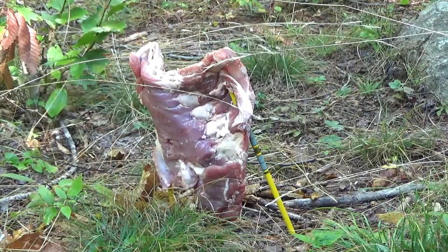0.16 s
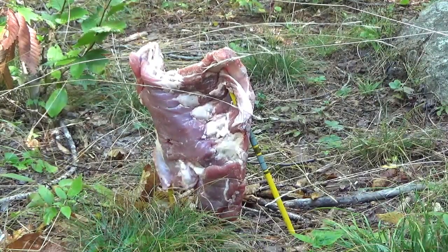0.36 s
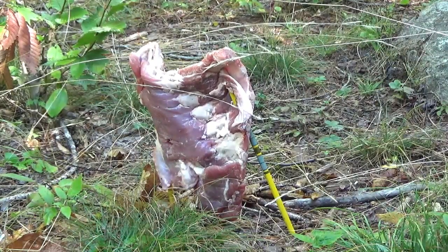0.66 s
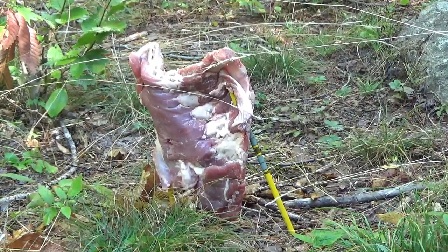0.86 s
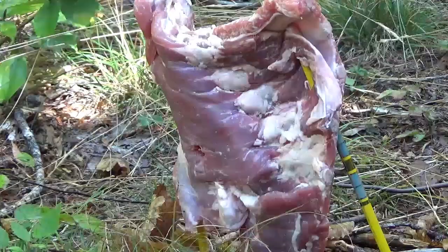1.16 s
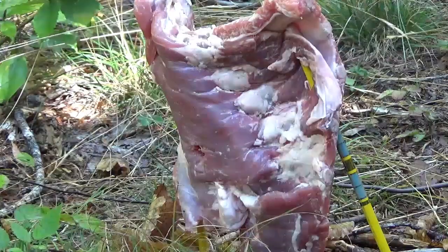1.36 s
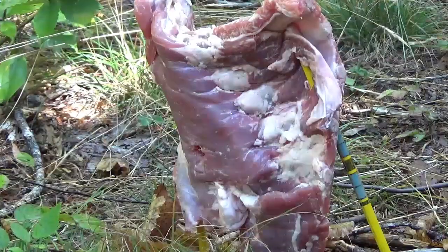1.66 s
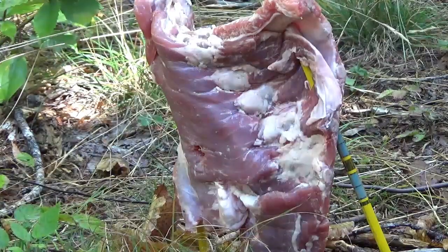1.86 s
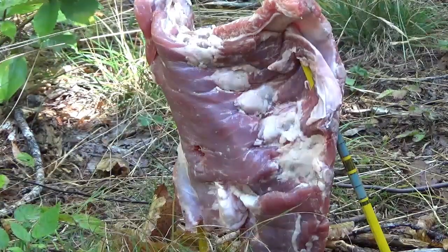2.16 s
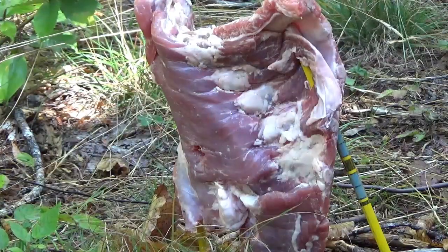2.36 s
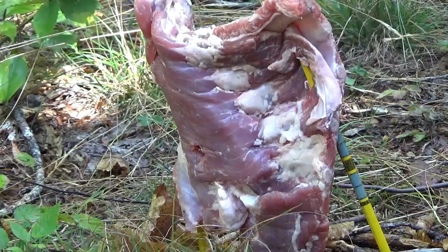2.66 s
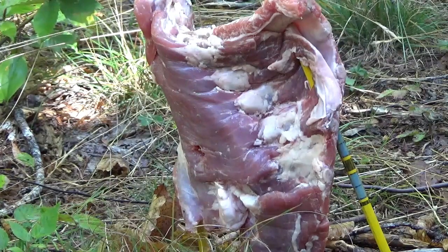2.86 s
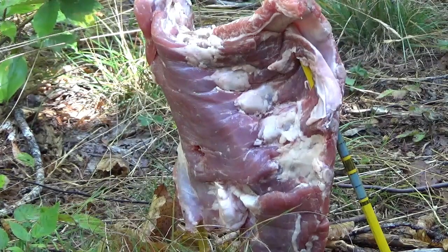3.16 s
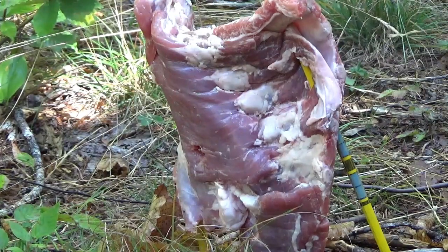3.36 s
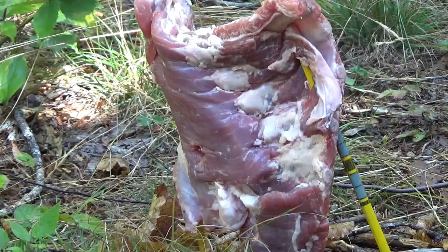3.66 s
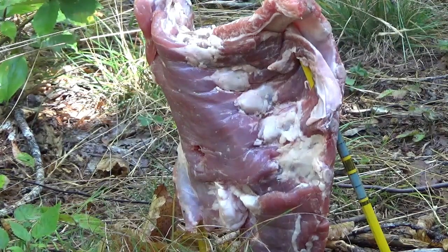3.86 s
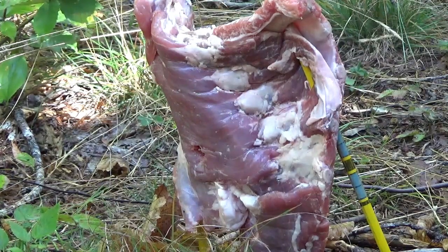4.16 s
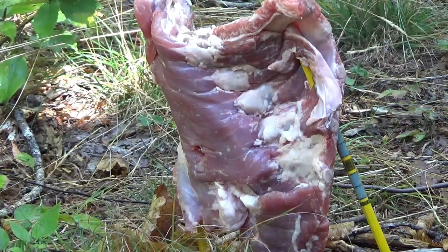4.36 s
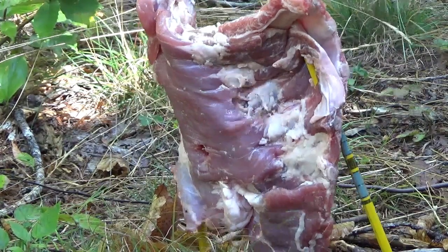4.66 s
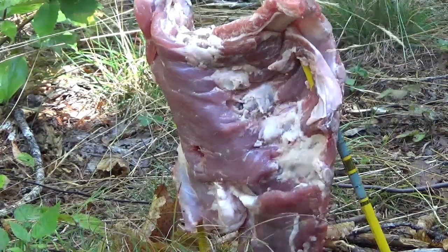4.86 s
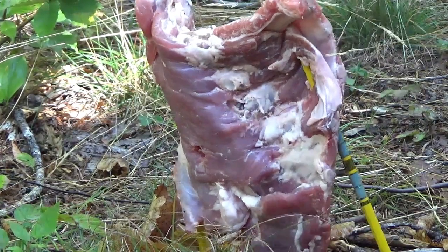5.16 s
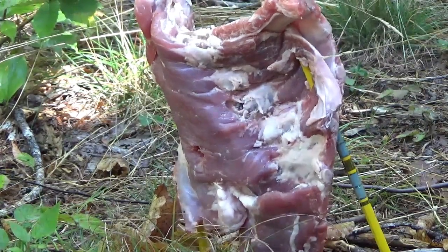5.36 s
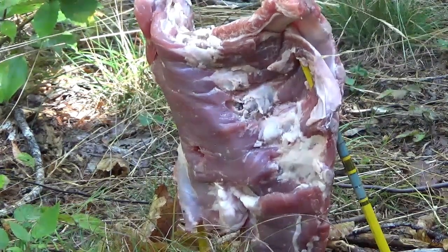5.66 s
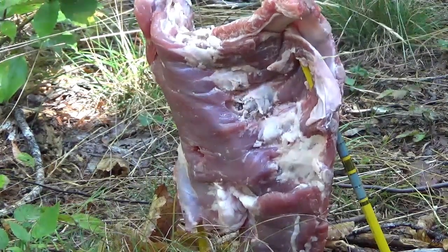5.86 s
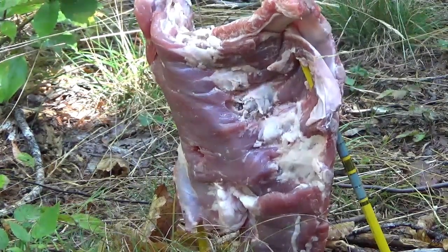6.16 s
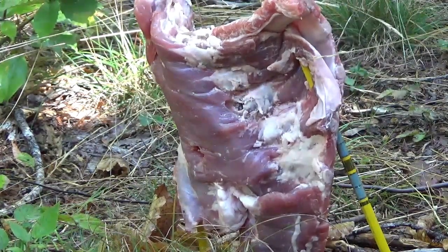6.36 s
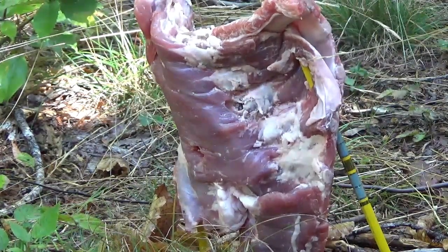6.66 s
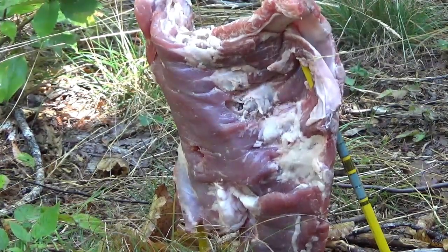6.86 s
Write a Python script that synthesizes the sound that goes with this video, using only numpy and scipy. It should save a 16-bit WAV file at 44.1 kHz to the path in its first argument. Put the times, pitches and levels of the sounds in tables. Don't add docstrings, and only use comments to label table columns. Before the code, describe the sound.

From 0 to 1.2 seconds there is a quiet, steady car on a far road: broad tyre roar with a low, uneven engine drone slowly receding. It cuts abruptly to a softer woodland hush of leaves, faint far road and microphone hiss. A cricket trills at once, a rapid string of thin high strokes around 4 kHz, swelling slightly and ending near 3.2 seconds as a few litter ticks sound. Tiny higher chirps follow around 3.8 to 4.3. At 4.42 the ball hits meat with a short wet slap and spray. At 4.53 the distant rifle's blast arrives, sudden and very loud, with several sharp swings and bright trunk echoes. A duller far echo swells behind, with distinct knocks near 4.8, then rolls away over the next second or so. Soil and twigs patter dryly from 5 to 7, brightest at 6.1, over quiet leaves.

```python
import sys
import numpy as np
from scipy import signal
from scipy.fft import rfft, irfft
from scipy.io import wavfile
from scipy.ndimage import uniform_filter1d, map_coordinates

SR = 44100
rng = np.random.default_rng(int(sys.argv[2]) if len(sys.argv) > 2 else 0)


def wrap_up_sound(samples):
    columns = np.atleast_2d(samples).T
    tamed = np.clip(columns, -1, 1)
    steps = np.round(tamed * 32767).astype(np.int16)
    wavfile.write(sys.argv[1], SR, steps)


def invert_db(x):
    u = np.asarray(x, float) / 20
    return 10 ** u


N = 309537

# f/Hz, density/dB
TYRE_SPECTRUM = [(150, -36), (250, -13.5), (441, -13), (551, -5.5), (743, -1.5), (1380, -5), (1720, -8),
                 (3230, -24.5), (3970, -22.5), (4500, -27.5), (7820, -33), (10900, -40), (14200, -72),
                 (22000, -120)]
# f/Hz, density/dB
ENGINE_SPECTRUM = [(13, -43), (22, -13), (38, -9), (71, 1), (102, -2), (141, -0.5), (215, -5), (243, -16),
                   (330, -17), (430, -45), (730, -120)]
# f/Hz, correlation/1
CAR_LIKENESS = [(60, 1.0), (170, 0.99), (500, 0.99), (1420, 0.66), (4090, 0.34), (11700, 0.88)]
# f/Hz, density/dB
HUSH_SPECTRUM = [(13, -38), (22, -11.5), (81, -8.5), (122, -4), (216, -10.5), (246, -6.5), (336, -8.5),
                 (878, -3.5), (1600, -9.5), (2360, -10.5), (4390, -13), (10900, -25.5), (14200, -90),
                 (22000, -120)]
# f/Hz, correlation/1
HUSH_LIKENESS = [(60, 1), (170, 0.9), (500, 0.85), (1420, 0.53), (4090, 0.41), (11700, 0.75)]
# t/s, level/dB
FAR_CHIRPS = [
    (1.245, -62),
    (3.84, -64),
    (3.97, -63),
    (4.10, -65),
    (4.32, -66),
]
# t/s, peak/dB, centre f/Hz, left-right/dB
LITTER_TICKS = [(3.1874, -44, 2920, 0), (3.188, -47, 1500, 2), (3.193, -48, 6500, 2), (3.222, -42, 3000, 0),
                (5.0394, -45, 6000, -1), (5.098, -42, 7400, 0), (5.1544, -42.5, 6000, 2),
                (5.223, -46, 7400, 8), (5.2604, -47, 5500, 2), (5.319, -40, 5200, 4),
                (5.3664, -55, 6000, 0), (5.442, -50, 8000, 4), (5.7564, -50, 6000, 0),
                (5.8634, -51, 3500, 0), (6.113, -37, 10700, -3), (6.113, -40.5, 6640, -10),
                (6.114, -49, 3400, -6), (6.151, -55, 4500, 0), (6.2054, -49, 7500, -2),
                (6.23, -44.5, 6600, -1), (6.258, -43.5, 3280, 0), (6.258, -48, 8000, 0),
                (6.4094, -49, 5200, 0), (6.8494, -55, 10500, -1), (6.985, -54, 9500, -1)]
# f/Hz, density/dB
SPRAY_SPECTRUM = [(180, -42), (300, -21), (676, -23), (739, -12), (1540, -1.5), (1820, -5.5), (6540, -6.5),
                  (10900, -11.5), (14200, -44), (22000, -120)]
# f/Hz, level/dB, t60/s
TARGET_MODES = [
    (1380, -23, .018),
    (3150, -32, .03),
    (5300, -37, .02),
    (780, -45, .06),
]
# f/Hz, density/dB
AHEAD_SPECTRUM = [(500, -2), (4000, -6), (8000, 5), (11000, -12)]
# t/s, peak/dB, ring f/Hz, left-right/dB
BLAST_SWINGS = [(4.5284, -6.5, 1300, 18), (4.5281, -8.5, 490, -5.5), (4.529, -21, 69, 3),
                (4.5355, -4.5, 1900, 1), (4.5361, -15.5, 140, 5), (4.538, -7, 4370, -1),
                (4.538, -2, 5500, 5), (4.543, -14, 3500, -4), (4.549, -12, 1800, -2),
                (4.5585, -27, 2300, -6), (4.5652, -17, 1190, -3), (4.8, -8, 1620, -8),
                (4.8593, -13, 1320, -11)]
# f/Hz, density/dB
NEAR_SPECTRUM = [(18, -48), (30, -18), (108, -20), (381, -9.5), (464, -7.5), (881, -2), (972, -5),
                 (1210, -1.5), (2950, -2.5), (4380, -0.5), (10900, -9.5), (14200, -74), (22000, -120)]
# f/Hz, density/dB
FAR_SPECTRUM = [(24, -53), (40, -24.5), (182, -17.5), (262, -10), (362, -10.5), (461, -4), (764, 0.5),
                (1900, -5.5), (2840, -18), (3210, -16), (5000, -37), (6500, -55), (11000, -120)]
# f/Hz, correlation/1
ROLL_LIKENESS = [(60, .95), (250, .8), (500, .68), (1400, .64), (4000, .68), (11000, .72)]
# f/Hz, loss/(dB/s)
NEAR_AIR_LOSS = [(60, -10), (300, -22), (1500, -23.5), (3000, 0.5), (5000, 9), (9000, 25), (10800, 63)]
# f/Hz, loss/(dB/s)
FAR_AIR_LOSS = [(40, 7), (100, 16), (250, -11.5), (550, -10.5), (1000, -4), (1600, 5), (2200, 18),
                (4000, 34.5)]

CHANGE_S = 1.1855
ROAR_DB, ENGINE_DB, ENGINE_SAG_DB_PER_S = -41, -48.5, 3
HUSH_DB, HUSH_SAG_DB_PER_S = -53.5, 0.21
FIRST_STROKE_S, STROKES_PER_S, STROKES = 1.2092, 44.2, 89
TIRES_AFTER, TIRED_LAG_S = 73, .00031
SONG_TOP_S, SONG_TOP_DB, SONG_ARCH_DB = 2.4, -55, 1.5
SONG_HZ, SONG_CLIMB_HZ_PER_S, STROKE_BEND_HZ = 4150, 60, 1050
SOIL_UNTIL_S, SOIL_Q, TWIG_Q = 5.2, 1.6, 2.05
TOP_HZ = 11070
SLAP_S, SLAP_DB = 4.4188, -34.5
FRONT_S = 4.5292
NEAR_COLOUR_S, FAR_COLOUR_S = 4.57, 5.1
NEAR_DB, NEAR_FLASH_DB, FLASH_S = -18, 4, .015
NEAR_HOLD_S, NEAR_KNEE_S, NEAR_FALL_DB_PER_S = 0.18, 0.039, 82
NEAR_REST_DB, NEAR_REST_DB_PER_S = -35.5, 30.5
FAR_DB, FAR_DELAY_S, FAR_RISE_DB_PER_S = -21, .11, 160
FAR_HOLD_S, FAR_KNEE_S, FAR_FALL_DB_PER_S = 0.18, 0.027, 33.5
FAR_REST_DB, FAR_REST_DB_PER_S = -39.5, 12.5
CYCLES_AT_1K, CYCLES_GROW = 1.95, 0.29
PUSH_BELOW_HZ, PUSH_CYCLES = 600, 0.88


def unit(x):
    return x / np.sqrt(np.mean(x ** 2) + 1e-20)


def along(points, hz):
    f, v = np.transpose(points)
    return np.interp(np.log(hz + 1), np.log(f + 1), v)


def wobble(knots_per_s):
    knots = rng.standard_normal(int(N * knots_per_s / SR) + 4)
    return map_coordinates(knots, [np.arange(N) * knots_per_s / SR])


def sides(db):
    return invert_db([[db / 2], [-db / 2]])


def add(track, s, sound):
    part = track[:, round(s * SR):][:, :sound.shape[1]]
    part += sound[:, :part.shape[1]]


def rush(spectrum, alike, patchy_db, start=0, stop=8, loss=((1, 0),), since=0):
    first, last = round(start * SR), min(round(stop * SR), N)
    noise = rng.standard_normal((2, last - first))
    hz, t, z = signal.stft(noise, SR, nperseg=1024, noverlap=768)
    field = rng.standard_normal(z.shape[1:])
    field = uniform_filter1d(uniform_filter1d(field, size=8, axis=0), size=8, axis=1)
    turn = np.arccos(np.clip(along(alike, hz), -1, 1)) / 2
    colour = invert_db(along(spectrum, hz))
    colour = colour / np.sqrt(np.mean(colour ** 2)) * [np.cos(turn), np.sin(turn)]
    fade_db = -along(loss, hz)[:, None] * np.clip(t + start - since, -1, 1)
    z = z * colour[:, :, None] * invert_db(patchy_db * unit(field) + fade_db)
    mid, side = signal.istft(z, nperseg=1024, noverlap=768)[1][:, :last - first]
    return np.pad([mid + side, mid - side], ((0, 0), (first, N - last)))


def car():
    t = np.arange(N) / SR
    engine_db = ENGINE_DB - ENGINE_SAG_DB_PER_S * t
    roar = invert_db(ROAR_DB + .3 * wobble(14)) * rush(TYRE_SPECTRUM, CAR_LIKENESS, .7, 0, 1.3)
    drone = invert_db(engine_db - 2.0 + 1.4 * wobble(11.3)) * rush(ENGINE_SPECTRUM, CAR_LIKENESS, -0.5, 0, 1.3)
    firing = 2 * np.pi * np.cumsum(73 + 4 * wobble(8.3)) / SR
    harmonics = np.sin(firing) + 0.9 * np.sin(2 * firing)
    drone += invert_db(engine_db - 5.5 + 2.4 * wobble(6.6)) * harmonics
    return (roar * sides(-2.4) + drone * sides(1)) * (np.arange(N) < CHANGE_S * SR)


def hush():
    t = np.arange(N) / SR - CHANGE_S
    level_db = HUSH_DB - HUSH_SAG_DB_PER_S * t + 0.96 * wobble(6)
    fade_in = np.clip(t / 0.013, 0, 1)
    return fade_in * invert_db(level_db) * rush(HUSH_SPECTRUM, HUSH_LIKENESS, patchy_db=1.05) * sides(-0.66)


def insects():
    track = np.zeros((2, N))
    count = np.arange(STROKES)
    times = FIRST_STROKE_S + count / STROKES_PER_S + TIRED_LAG_S * np.clip(count - TIRES_AFTER, 0, None)
    t = np.arange(round(.0135 * SR)) / SR
    swell = np.sin(np.pi * (t / t[-1]) ** .75) ** .8
    chance = rng.standard_normal((STROKES, 3)) * [1.1, 30, 2]
    for at, (size_db, bend_hz, turn) in zip(times, chance):
        from_top_s = at - SONG_TOP_S
        pitch_hz = SONG_HZ + SONG_CLIMB_HZ_PER_S * from_top_s + bend_hz - STROKE_BEND_HZ * (t / t[-1]) ** 2
        tone = np.sin(2 * np.pi * np.cumsum(pitch_hz) / SR + turn)
        level_db = SONG_TOP_DB - SONG_ARCH_DB * from_top_s ** 2 + 3 + size_db
        add(track, at - .0052, sides(-1.8) * invert_db(level_db) * swell * tone)
    t = np.arange(round(0.031 * SR)) / SR
    chirp = np.sin(np.pi * t / t[-1]) * np.sin(2 * np.pi * 6380 * t)
    for at, db in FAR_CHIRPS:
        add(track, at - .012, sides(0) * invert_db(db) * chirp)
    return track


def litter():
    track = np.zeros((2, N))
    t = np.arange(round(.03 * SR)) / SR
    decay = invert_db(-60 * t / .014) + .16 * invert_db(-60 * t / .07)
    envelope = decay * (1 - np.exp(-t / .0004))
    for s, db, hz, pan_db in LITTER_TICKS:
        burst = rng.standard_normal(len(t)) * envelope
        burst[[8, 50]] += 3
        q = SOIL_Q if 4.5 < s < SOIL_UNTIL_S else TWIG_Q
        leaf = signal.iirpeak(min(hz, TOP_HZ), q, SR)
        click = signal.lfilter(*leaf, signal.lfilter(*leaf, burst))
        add(track, s, sides(pan_db) * invert_db(db) * click / np.abs(click).max())
    return track


def impact():
    t = np.arange(N) / SR - SLAP_S
    rise_db = np.where(t < 0, 2500 * t - 8, -155 * t)
    grit_db = 1.6 * wobble(250)
    spray = rush(SPRAY_SPECTRUM, [(300, 0.72), (3000, 0.53)], patchy_db=2.5, start=4.3, stop=4.9)
    track = invert_db(SLAP_DB + rise_db + grit_db) * spray * sides(1.5)
    u = np.arange(SR // 8) / SR
    ring = sum(invert_db(db - 60 * u / t60_s) * np.sin(2 * np.pi * hz * u) for hz, db, t60_s in TARGET_MODES)
    add(track, 4.4232, sides(6.6) * ring * (1 - np.exp(-u / 0.0011)))
    return track


def blast():
    track = np.zeros((2, N))
    for s, db, hz, pan_db in BLAST_SWINGS:
        cycles = PUSH_CYCLES if hz < PUSH_BELOW_HZ else CYCLES_AT_1K * (hz / 1000) ** CYCLES_GROW
        u = np.arange(SR // 30) / SR * hz / cycles
        swell = 8 * u ** 1.56 * np.exp(-2.4 * u - u ** 4)
        add(track, s, sides(pan_db) * invert_db(db) * swell * np.sin(2 * np.pi * cycles * u))
    return track


def past(t, knee_s):
    return knee_s * np.logaddexp(0, t / knee_s)


def echo_gains(t):
    near_db = NEAR_DB + NEAR_FLASH_DB * np.exp(-np.abs(t) / FLASH_S)
    near = invert_db(near_db - NEAR_FALL_DB_PER_S * past(t - NEAR_HOLD_S, NEAR_KNEE_S))
    near = np.hypot(near, invert_db(NEAR_REST_DB - NEAR_REST_DB_PER_S * t))
    far = invert_db(FAR_DB - FAR_FALL_DB_PER_S * past(t - FAR_HOLD_S, FAR_KNEE_S))
    far = np.hypot(far, invert_db(FAR_REST_DB - FAR_REST_DB_PER_S * t))
    return near, far * invert_db(-FAR_RISE_DB_PER_S * past(FAR_DELAY_S - t, 0.0068))


def roll():
    t = np.arange(N) / SR
    near_gain, far_gain = echo_gains(t - FRONT_S)
    front_db = np.clip(14000 * (t - FRONT_S), -90, 0)
    trunks_db = 1.3 * wobble(400) + .5 * wobble(45)
    near = rush(NEAR_SPECTRUM, ROLL_LIKENESS, .25, 4.5, 8, NEAR_AIR_LOSS, since=NEAR_COLOUR_S)
    far = rush(FAR_SPECTRUM, ROLL_LIKENESS, .25, 4.5, 8, FAR_AIR_LOSS, since=FAR_COLOUR_S)
    track = invert_db(front_db + trunks_db) * (near_gain * near * sides(-0.75) + far_gain * far * sides(-0.59))
    ahead = np.clip((t - 4.518) / .005, 0, 1) * (t < 4.53)
    return track + invert_db(-37) * ahead * rush(AHEAD_SPECTRUM, ROLL_LIKENESS, 1, 4.5, 4.6)


def scene():
    return car() + hush() + insects() + litter() + impact() + blast() + roll()


def band_limit(x):
    return signal.sosfilt(signal.butter(12, 12340, fs=SR, output="sos"), x)


def record(dry):
    hz = np.fft.rfftfreq(N, 1 / SR)
    kept = irfft(rfft(dry) / (1 + (hz / TOP_HZ) ** 400), N)
    soft = kept / (1 + np.abs(kept) ** 14) ** (1 / 14)
    return band_limit(soft)


dry = scene()
out = record(dry)
wrap_up_sound(out)
```